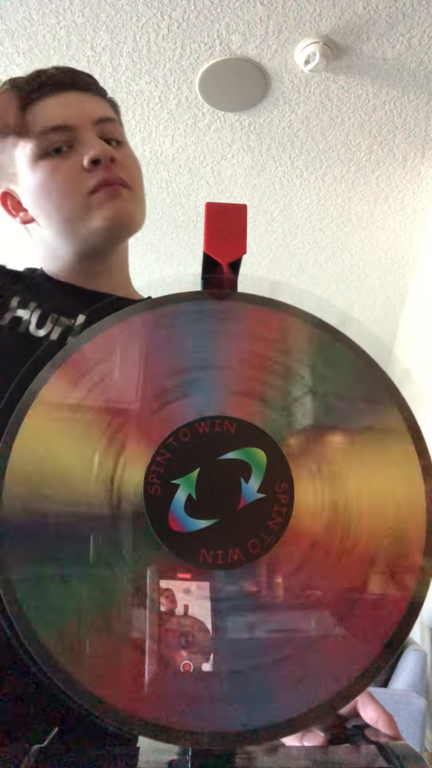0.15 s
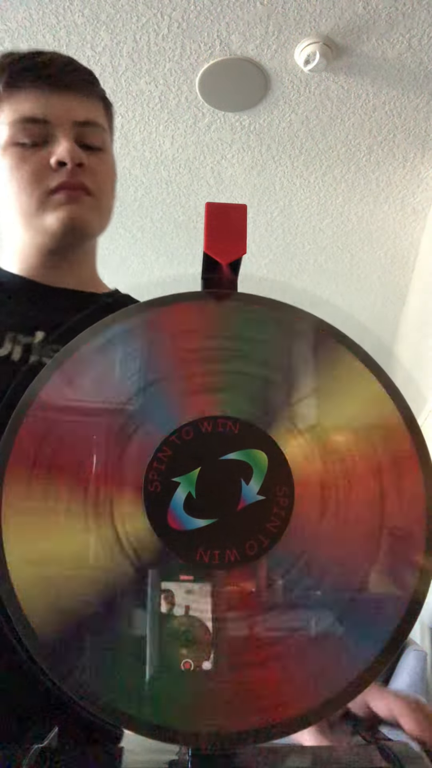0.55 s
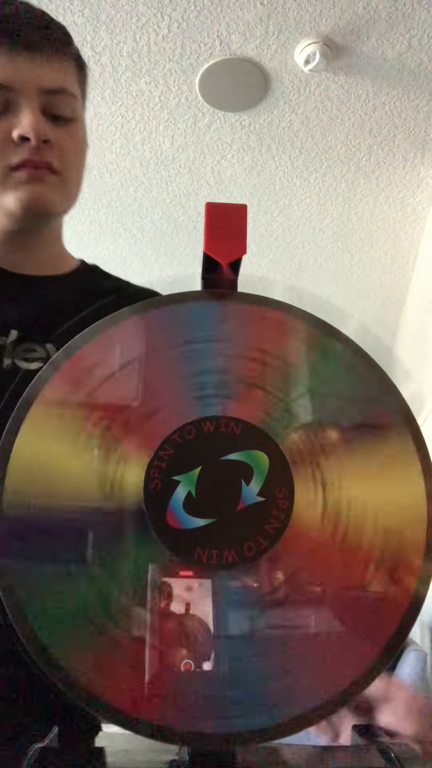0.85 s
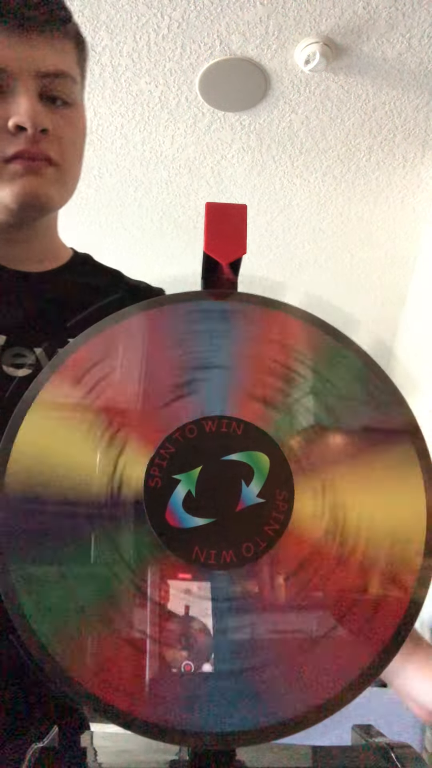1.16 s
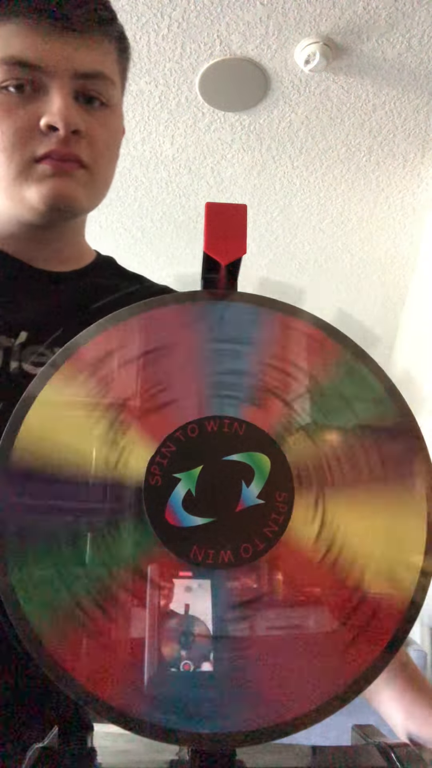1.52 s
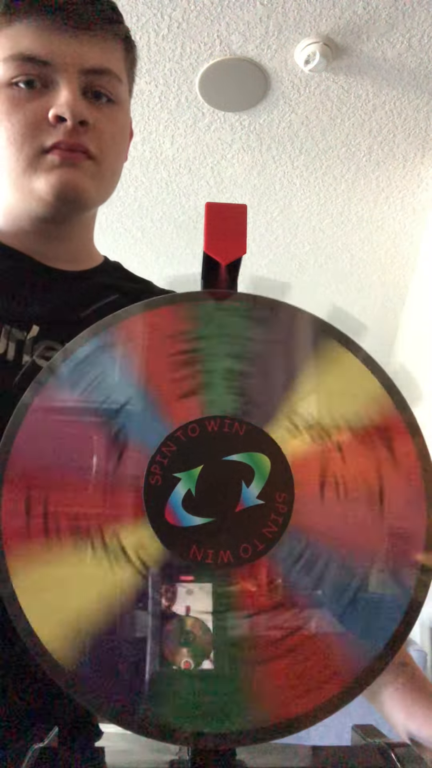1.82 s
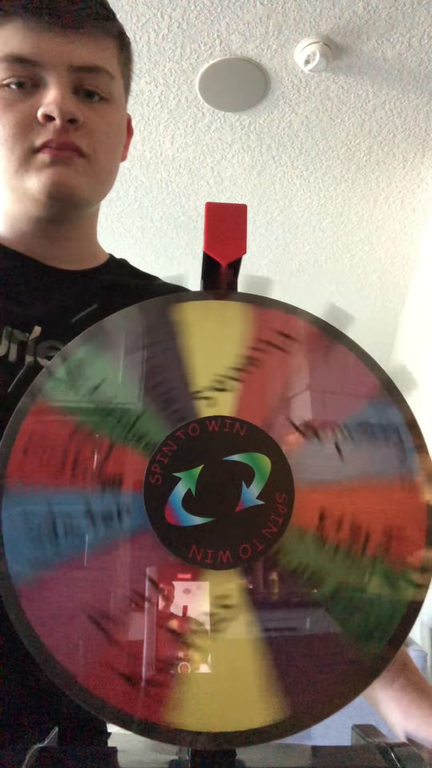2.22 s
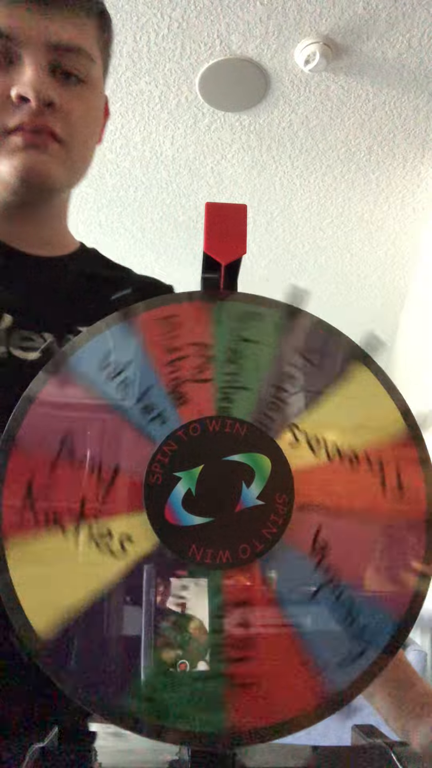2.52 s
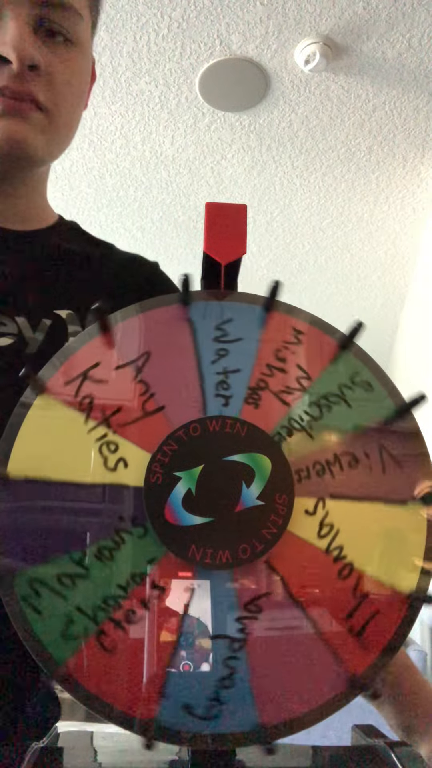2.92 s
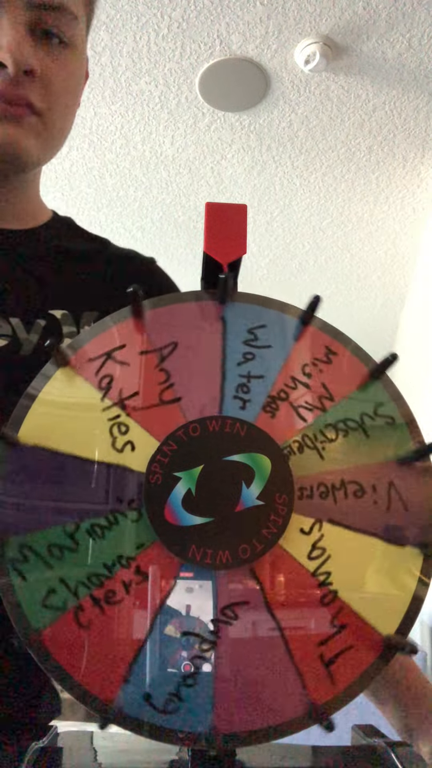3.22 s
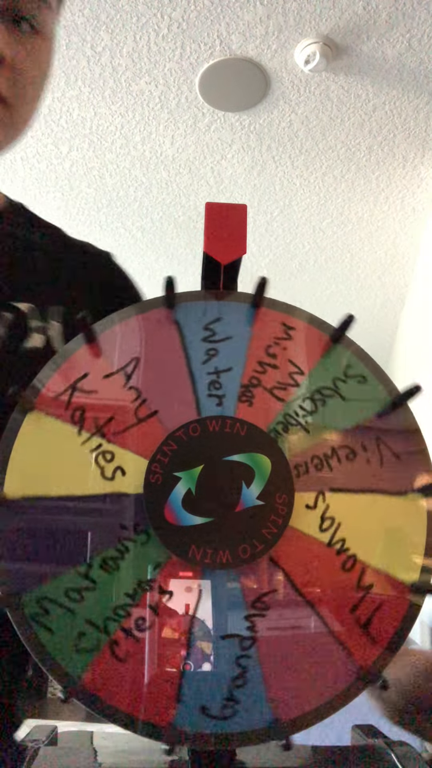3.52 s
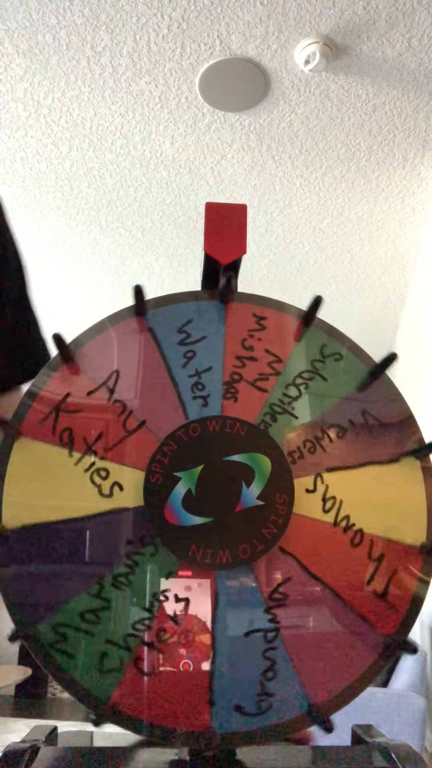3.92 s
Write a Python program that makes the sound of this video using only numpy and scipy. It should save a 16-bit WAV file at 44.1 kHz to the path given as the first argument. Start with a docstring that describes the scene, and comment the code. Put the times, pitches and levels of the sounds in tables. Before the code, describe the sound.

Fast, bright ratcheting ticks from a spinning wheel slow steadily to a last single snap, then faint nudges over soft ventilation hush.

```python
"""Prize wheel coasting to a stop

A tabletop prize wheel slows down in a small, quiet room, close to the microphone.
Every peg flicks the plastic flapper: it snaps back, rattles against the rim and knocks the disc, ever more slowly.
Snaps are noisy contact forces through the flapper's resonances; pegs and disc ring as decaying sines.
Between snaps the next peg brushes the flapper; the last peg fails to pass and only nudges it.
Decaying noise makes the room, shaped noise and two wavering tones the ventilation."""
import sys
import numpy as np
from scipy import signal
from scipy.fft import rfft, irfft, next_fast_len
from scipy.io import wavfile
from scipy.ndimage import map_coordinates

SR = 44100
rng = np.random.default_rng(int(sys.argv[2]) if len(sys.argv) > 2 else 0)


def dump(signal):
    """Clip the signal to [-1, 1] and save it as 16-bit WAV at the path in sys.argv[1]."""
    limited = np.clip(np.atleast_2d(signal).T, -1, 1)
    pcm = np.round(limited * 32767).astype(np.int16)
    wavfile.write(sys.argv[1], SR, pcm)


N = 179380
T = np.arange(8192) / SR  # time axis of one short sound, s
HZ = np.fft.rfftfreq(len(T), 1 / SR)


# flapper snaps; levels are relative within each layer, disc_hz is the centre of the favoured disc modes:
# [start_s, level_db, knock_db, disc_hz, peg_ring_db, peg_hz]
SNAP_EVENTS = [(0.0004, -13.5, -36.5, 370, -18, 3890), (0.0285, -14, -32, 392, -27, 3920),
               (0.0563, -14.5, -34.5, 380, -28, 3730), (0.0834, -15, -32.5, 378, -33, 4340),
               (0.1113, -15, -32.5, 390, -25, 3640), (0.1392, -13, -34, 396, -29, 4360),
               (0.169, -15, -34, 390, -21, 4390), (0.197, -14, -30, 416, -23, 4150),
               (0.2264, -14, -32.5, 426, -32, 3760), (0.2576, -15, -34, 437, -19, 4220),
               (0.2855, -14, -31.5, 407, -35, 3890), (0.316, -15.5, -31.5, 395, -19, 4000),
               (0.3474, -13.5, -32.5, 404, -37, 3890), (0.3779, -14.5, -34, 386, -31, 3970),
               (0.41, -15.5, -34.5, 404, -28, 3840), (0.4399, -14, -33.5, 376, -37, 3690),
               (0.4736, -14, -35, 345, -32, 4310), (0.5062, -15, -34.5, 423, -25, 3820),
               (0.5392, -14.5, -35, 410, -43, 3900), (0.5722, -14, -33, 356, -18, 3950),
               (0.6059, -14, -33.5, 423, -25, 3590), (0.6409, -14, -33.5, 433, -22, 3980),
               (0.6754, -13.5, -30.5, 439, -33, 4070), (0.7111, -15, -33, 436, -16, 3920),
               (0.7475, -14.5, -32, 420, -20.5, 3820), (0.7836, -15, -33.5, 440, -33, 3890),
               (0.822, -13.5, -30.5, 440, -42, 3700), (0.8596, -15, -31.5, 443, -23, 3960),
               (0.8973, -15.5, -34, 430, -21, 3875), (0.9376, -15, -32.5, 394, -48, 4240),
               (0.9761, -14, -32.5, 431, -32, 3840), (1.0179, -14, -33, 380, -33, 3970),
               (1.0597, -14, -34.5, 410, -22, 4340), (1.1025, -14, -33, 440, -26, 4470),
               (1.1453, -13.5, -32.5, 400, -28, 3930), (1.1905, -14, -34, 433, -36, 3890),
               (1.2356, -13.5, -31.5, 446, -17.5, 3870), (1.281, -13.5, -33.5, 440, -15, 3900),
               (1.3309, -14.5, -33, 447, -22, 3750), (1.3796, -13.5, -32.5, 460, -20, 4040),
               (1.4311, -13.5, -31, 436, -20, 3930), (1.484, -13.5, -33, 417, -18, 3910),
               (1.5372, -14.5, -36.5, 404, -17, 3960), (1.5939, -13.5, -34.5, 380, -16, 3930),
               (1.6518, -13.5, -34.5, 434, -27, 3810), (1.7129, -13.5, -34.5, 363, -29, 4040),
               (1.7761, -14, -33, 414, -23, 4370), (1.8433, -13, -33, 425, -43, 3950),
               (1.9136, -13, -32.5, 400, -19.5, 4270), (1.9883, -13.5, -36, 528, -19.5, 4190),
               (2.0688, -13.5, -32.5, 425, -46, 4540), (2.1537, -14, -33, 431, -49, 4570),
               (2.249, -14, -34.5, 536, -20, 4470), (2.355, -13.5, -33.5, 426, -23.5, 4370),
               (2.4768, -13.5, -29.5, 445, -25, 3780), (2.625, -13, -29.5, 455, -22.5, 4010),
               (2.8366, -12.5, -30.5, 442, -12, 4250)]
# the slowing wheel strikes duller, hollower and rattles less; levels are relative:
# [start_s, sizzle_db, hollow_tock_db, rattle_t60_s, slap_db]
SLOWING = [(0, 2, -2, 0.047, -2.5), (.8, 2.5, -1, 0.057, -4.5), (1.502, -0.5, -1, 0.044, -6),
           (2.15, 0.5, 3.5, 0.044, -6), (2.6, -1.5, 2, 0.05, -6), (2.85, -1.5, 1.5, 0.014, 0)]


def snaps(body, sizzle):
    """The flapper scrapes over each peg, flies off, slaps home, rattles and knocks the disc."""
    clicks, knocks, to_room = np.zeros((3, N))
    when, *controls = np.transpose(SLOWING)
    for start, level_db, knock_db, disc_hz, ring_db, peg_hz in SNAP_EVENTS:
        sizzle_db, tock_db, rattle_t60, slap_db = [np.interp(start, when, c) for c in controls]
        sizzle_gain = amp(sizzle_db + 2)

        slap = chatter(0.011, rise=0.0015, bounce_db=2)
        force = chatter(rattle_t60, rise=0.0018, bounce_db=8) + amp(slap_db) * slap
        click = norm(through(force, body)) + sizzle_gain * norm(through(force, sizzle))
        add(clicks, start + 0.0002, amp(level_db + 16) * click)

        ring = amp(ring_db + 16) * peg_ring(peg_hz, t60=0.05)
        add(clicks, start + 0.000959, ring)

        knock = disc_knock(disc_hz, tock_db, favour_db=6.5, favour_width_hz=36, scatter_db=1.43)
        add(knocks, start + 0.00043, amp(knock_db + 25.5) * knock)

        # played backwards, the scrape swells until the tip slips off
        scrape_force = chatter(0.025, rise=0.00044, bounce_db=14)
        scrape = norm(through(scrape_force, body))[::-1]
        add(clicks, start - len(T) / SR, amp(level_db - 6.5) * scrape)

        # the room is struck by the whole snap at once
        whole_snap = amp(level_db + 17) * (body + sizzle_gain * sizzle)
        add(to_room, start, whole_snap + amp(-6) * ring)
    return clicks, knocks, to_room


# resonances of the flapper and its bracket, half-width taken at half amplitude:
# [pitch_hz, half_width_hz, relative_level_db]
FLAPPER_MODES = [(1810, 15, -10), (2005, 28, -13.5), (3023, 41, -2), (3520, 340, -8.5), (3670, 42, -9),
                 (3914, 42, 3), (3950, 70, -4), (4322, 70, 1), (4880, 270, -4.5), (5290, 140, -4.5),
                 (6200, 70, -4), (6644, 142, -1), (7014, 110, -3), (7576, 120, -4.5), (8100, 100, -9),
                 (8280, 240, -14.5)]
# the plastic's bed of dense, damped resonances: [frequency_hz, relative_level_db]
PLASTIC_BED = [(150, -37.5), (400, -20.5), (1050, -14.5), (1400, -20), (2100, -18.5), (2350, -9.5),
               (2680, -23), (2900, -19.5), (3150, -10), (4600, -12), (5700, -11), (7000, -10),
               (9500, -15.5), (12000, -36)]


def flapper_body(dense_db):
    """The flapper's main resonances over a bed of dense, damped ones."""
    power = amp(dense_db + along(PLASTIC_BED, HZ)) ** 2
    for hz, half_width, db in FLAPPER_MODES:
        peak = amp(db) / (1 + ((HZ - hz) / half_width) ** 2)
        power = power + peak ** 2
    return causal(np.sqrt(power))


# bright top of each contact: [frequency_hz, relative_level_db]
SIZZLE_SPECTRUM = [(5000, -33), (8000, -20.5), (9200, -9), (10400, -13.5), (11200, -6.5), (12000, -10),
                   (13050, -0.5), (13800, -6), (14600, -8.5), (15200, -5.5), (15700, -7.5), (16200, 1)]


def contact_sizzle():
    """The treble-heavy response excited by the same gritty contacts."""
    return colour(SIZZLE_SPECTRUM)


def chatter(t60, rise, bounce_db):
    """Contact force: a gritty first hit and bounces a few milliseconds apart."""
    bounce_phase = (T * rng.uniform(230, 340)) % 1  # bounces per second
    grit = rng.choice([-1, 1], len(T))
    return norm(grit * amp(-bounce_db * bounce_phase) * fade(t60, rise))


def peg_ring(hz, t60):
    """A short peg rings at its own pitch."""
    return norm(np.sin(2 * np.pi * hz * T) * fade(t60, 0.00065))


# modes of the disc on its stand: [pitch_hz, relative_level_db, t60_s, build_up_s]
DISC_MODES = [(94, -27, 0.21, 0.0073), (179.7, -17.5, 0.12, 0.0023), (319, -5, 0.041, 0.002),
              (386, 1.5, 0.041, 0.0066), (444.6, 0, 0.059, .006), (537, -9, 0.088, 0.0053),
              (577, -12, .05, 0.0026), (721, -6, 0.049, 0.00243), (824, -8, 0.027, 0.002),
              (973, -3, .04, 0.0015), (1040, -7, 0.042, .001)]


def disc_knock(disc_hz, tock_db, favour_db, favour_width_hz, scatter_db):
    """The kick spreads through the disc: modes swell at their own pace, and the wheel's angle favours some."""
    modes_hz = np.array(DISC_MODES)[:, 0]
    favour = np.exp(-((modes_hz - disc_hz) / favour_width_hz) ** 2)
    hollow = modes_hz > 650
    scatter = scatter_db * rng.standard_normal(len(DISC_MODES))
    gains = amp(favour_db * favour + tock_db * hollow + scatter)
    knock = np.zeros(len(T))
    for k, (hz, db, t60, rise) in enumerate(DISC_MODES):
        sign = (-1) ** k  # neighbouring modes start in opposite directions
        knock += sign * gains[k] * amp(db) * np.sin(2 * np.pi * hz * T) * fade(t60, rise)
    return norm(knock)


def brushes(body, sizzle):
    """At speed the next peg catches the flapper near two thirds of each gap, with the previous snap's ring pitch."""
    out = np.zeros(N)
    for (start, *_, peg_hz), (next_start, *_) in zip(SNAP_EVENTS, SNAP_EVENTS[1:]):
        if start < 1.5:
            late, strength = rng.uniform(-1, 1, 2)
            force = chatter(0.022, rise=0.001, bounce_db=8)
            level_db = np.interp(start, [0, 0.7, 1.5], [-5, -5, -10]) + 3 * strength
            brush = norm(through(force, body + sizzle)) + amp(-4) * peg_ring(peg_hz, t60=0.045)
            gap = next_start - start
            add(out, start + gap * (0.64 + 0.045 * late), amp(level_db) * brush)
    return out


# light touches of a peg on the flapper, levels relative within each layer:
# [start_s, level_db, sizzle_db, peg_ring_db, peg_hz]
TOUCH_EVENTS = [(1.5727, -33, -30, -28.5, 4050), (1.6312, -20, -27, -29, 4090),
                (1.6915, -24, -27, -26, 3960), (1.7543, -19, -24, -39, 4370), (1.819, -18, -25, -30, 4340),
                (1.8856, -36, -24.5, -26.5, 3960), (2.043, -19, -29.5, -33.5, 3890),
                (2.1254, -27, -31, -34.5, 4350), (2.2174, -34, -30, -30.5, 4360),
                (2.3176, -25, -31, -34, 4040), (2.435, -28.5, -38, -35.5, 4300),
                (2.5716, -27.5, -48.5, -49, 4130), (2.759, -31.5, -46, -51, 4360),
                (3.1056, -39.5, -48, -40.5, 3840), (3.3084, -48.5, -79.5, -41.5, 4300),
                (3.4324, -52.5, -64, -77, 4480), (3.7624, -32, -43.5, -41, 3780)]


def touches(body, sizzle):
    """A slow peg meets the flapper with a soft, dry tick."""
    out = np.zeros(N)
    for start, level_db, sizzle_db, ring_db, peg_hz in TOUCH_EVENTS:
        force = chatter(0.028, rise=0.0024, bounce_db=7)
        tick = amp(level_db + 8.5) * norm(through(force, body))
        ring = amp(ring_db + 14.5) * peg_ring(peg_hz, t60=0.029)
        add(out, start, tick + ring)
        add(out, start, amp(sizzle_db + 18.5) * norm(through(force, sizzle)))
    return out


def room(x, response):
    """Reflections 6 ms behind; each twelfth of a second draws fresh decaying noise, for a smooth, diffuse room."""
    out, size = np.zeros(N), SR // 12
    for start in range(0, N, size):
        reflected = signal.fftconvolve(x[start:start + size], response())
        add(out, start / SR + 0.006, reflected)
    return out


def near_echoes(t60):
    """Quick reflections from the table, the disc and the nearest wall, as decaying noise."""
    return norm(rng.standard_normal(len(T)) * fade(t60, 0.002))


# decay time of the room: [frequency_hz, t60_s]
ROOM_DECAY = [(150, 0.57), (500, 0.62), (1800, 0.84), (4200, .48), (7000, .4), (10000, 0.42), (15000, 0.24)]


def wall_tail():
    """The room's diffuse decay: noise that dies away faster in the treble."""
    hz, t, noise = signal.stft(rng.standard_normal(SR // 2), SR, nperseg=256)
    decay = amp(-60 * t / along(ROOM_DECAY, hz)[:, None])
    _, tail = signal.istft(noise * decay, SR, nperseg=256)
    return norm(tail)


# spectrum of the rushing air: [frequency_hz, relative_level_db]
AIR_SPECTRUM = [(21, -51), (35, -62), (56, -31.5), (80, -11.5), (103, -26.5), (139, 0.5), (174, -4.5),
                (235, -3), (487, -6.5), (552, -13.5), (764, -11.5), (1750, -18), (3900, -27), (5010, -31.5),
                (14000, -52.5)]
# hum tones, each level the centre of its swell: [pitch_hz, rms_level_db]
HUM_TONES = [(71, -67), (140, -74.5)]


def ventilation():
    """A dull, steady rush of shaped noise with a faint hum wavering in phase and level."""
    noise = rng.standard_normal(N + SR)
    air = norm(through(noise, colour(AIR_SPECTRUM))[SR:]) * np.sqrt(N)  # unit rms
    t = np.arange(N) / SR
    hum = np.zeros(N)
    for hz, db in HUM_TONES:
        # smooth random curves through 12 points a second
        drift, swell = [map_coordinates(rng.standard_normal(64), [t * 12]) for _ in range(2)]
        tone = np.sqrt(2) * np.sin(2 * np.pi * hz * t + 0.34 * drift)
        hum += amp(db + 1.4 * swell) * tone
    return amp(-53.0) * air + hum


def amp(db):
    """Decibels to gain."""
    return 10 ** (np.asarray(db) / 20)


def norm(x):
    """Scale to unit energy."""
    return x / np.sqrt(np.sum(x ** 2) + 1e-20)


def along(points, hz):
    """(Hz, value) points read on a log axis."""
    f, v = np.transpose(points)
    return np.interp(np.log(hz + 1), np.log(f), v)


def add(track, s, sound):
    """Mix a sound into the track at time s, trimming what falls outside."""
    start = round(s * SR)
    sound = sound[max(0, -start):]
    part = track[max(0, start):][:len(sound)]
    part += sound[:len(part)]


def fade(t60, rise):
    """A struck thing's envelope: a quick build-up under an exponential decay."""
    return amp(-60 * T / t60) * (1 - np.exp(-T / rise))


def colour(points):
    """Impulse response of a (Hz, dB) spectrum."""
    return causal(amp(along(points, HZ)))


def through(x, response):
    """x convolved with a response, at its own length."""
    return signal.fftconvolve(x, response)[:len(x)]


def causal(gain):
    """Unit-energy causal impulse response with the given spectral shape, by folding the cepstrum."""
    cepstrum = irfft(np.log(gain))
    half = len(cepstrum) // 2
    cepstrum[1:half] *= 2
    cepstrum[half + 1:] = 0
    return norm(irfft(np.exp(rfft(cepstrum))))


def scene():
    """The wheel, its room and the background."""
    body, sizzle = flapper_body(dense_db=1), contact_sizzle()
    clicks, knocks, to_room = snaps(body, sizzle)
    ticks = brushes(body, sizzle) + touches(body, sizzle)
    early_send = amp(-6) * to_room + amp(-14) * knocks + amp(-15.5) * ticks
    late_send = amp(-9.5) * to_room + amp(-12) * knocks + amp(-15) * ticks
    early = room(early_send, lambda: near_echoes(t60=0.11))
    late = room(late_send, wall_tail)
    return (clicks + knocks + ticks + early + late + ventilation())[None]


def record(dry):
    """A steep low-pass: next to nothing sounds above about 16 kHz."""
    cutoff_hz = 15850
    size = next_fast_len(N + SR // 2)
    lowpass = 1 / (1 + (np.fft.rfftfreq(size, 1 / SR) / cutoff_hz) ** 160)
    return irfft(rfft(dry, size) * lowpass, size)[..., :N]


dry = scene()
out = record(dry)
dump(out)
```